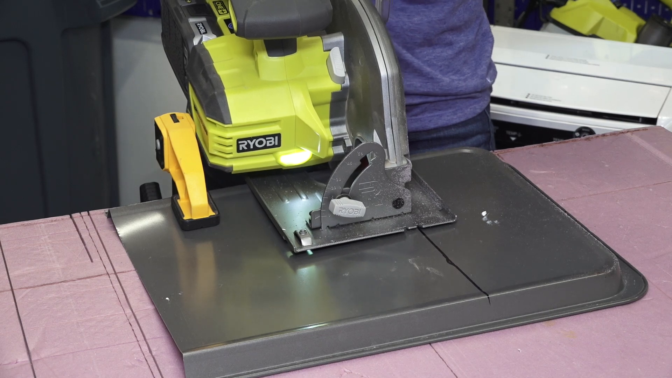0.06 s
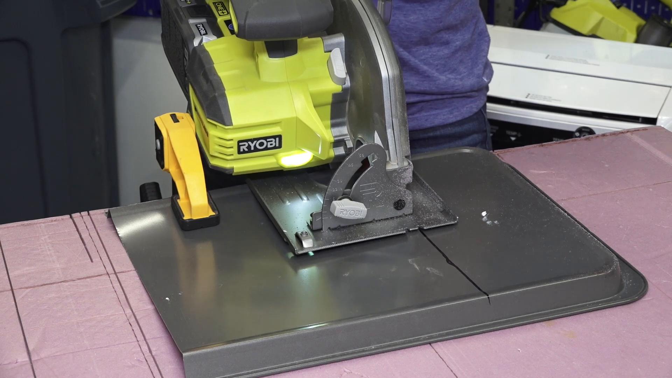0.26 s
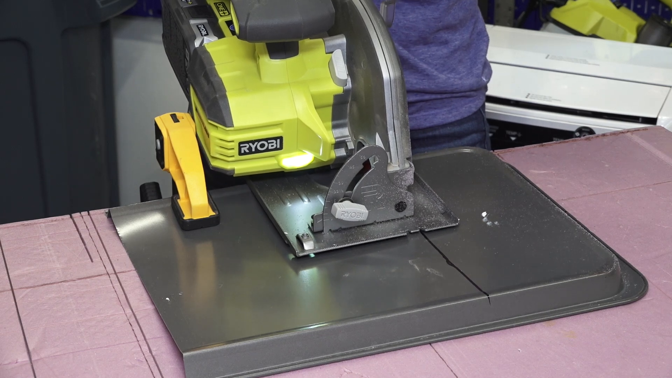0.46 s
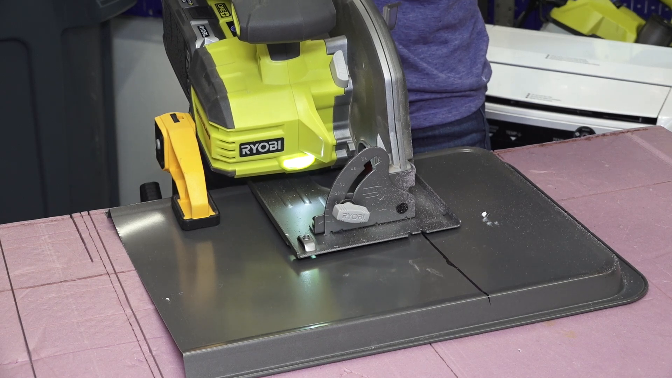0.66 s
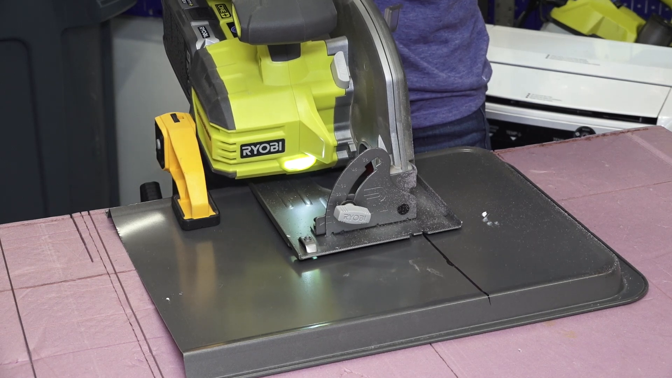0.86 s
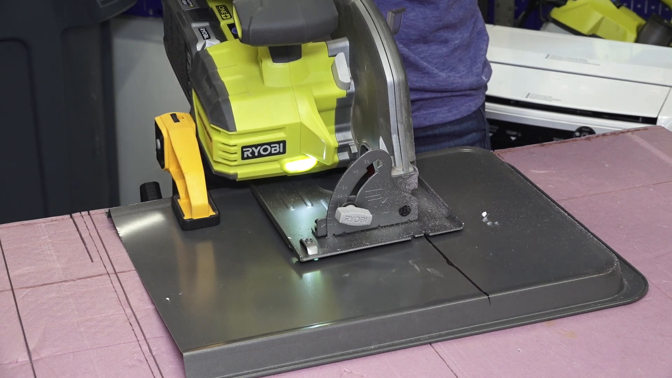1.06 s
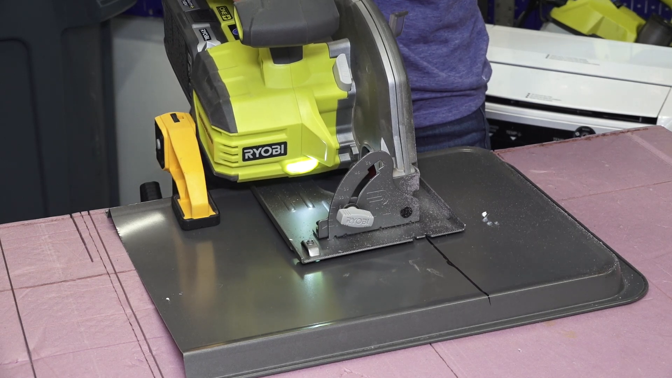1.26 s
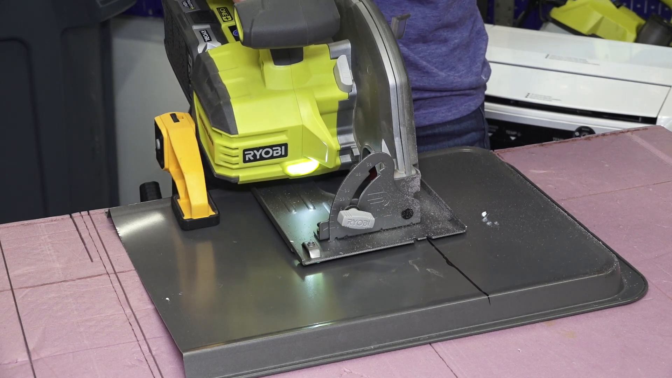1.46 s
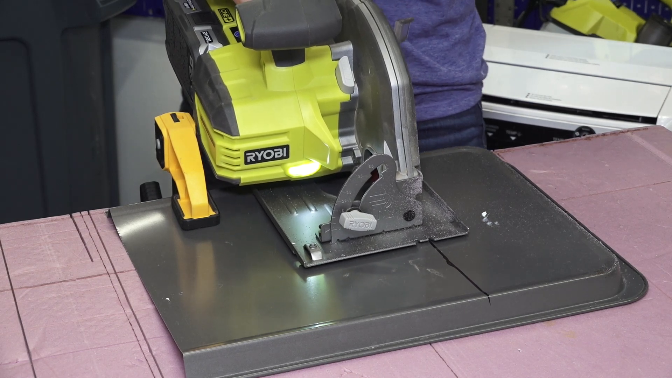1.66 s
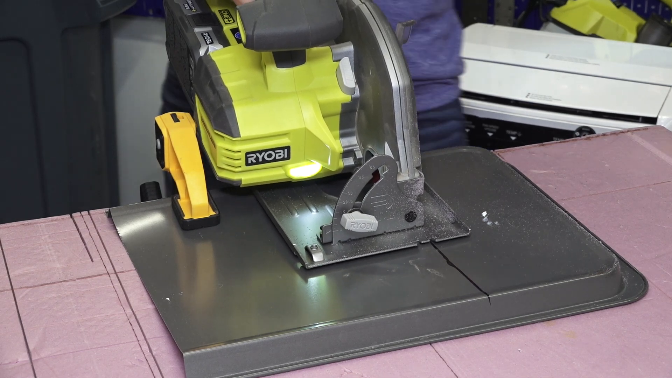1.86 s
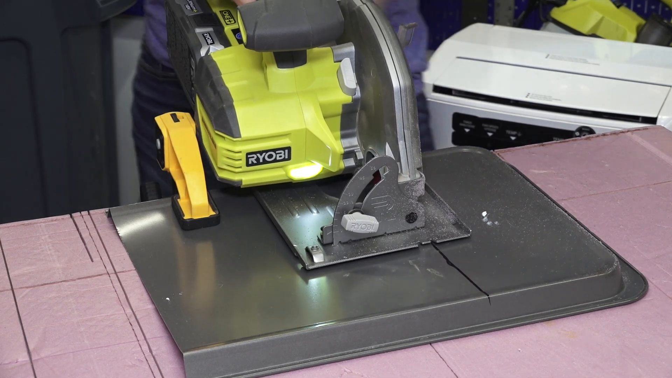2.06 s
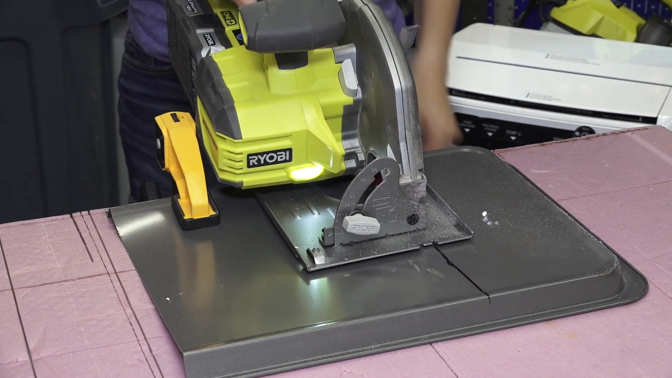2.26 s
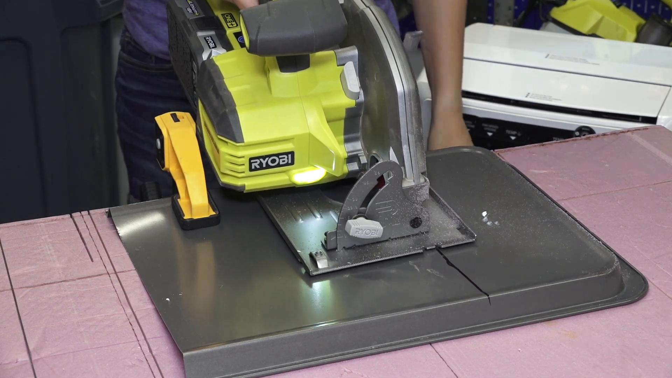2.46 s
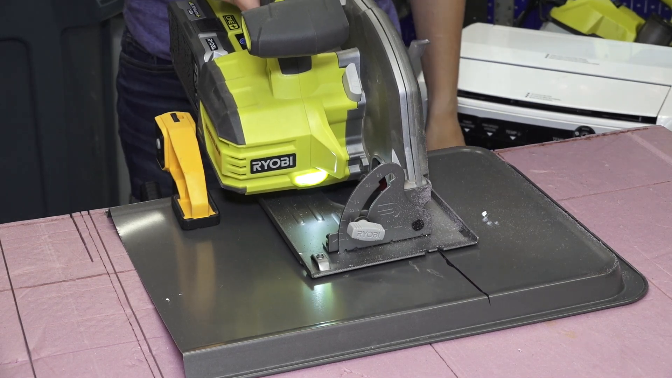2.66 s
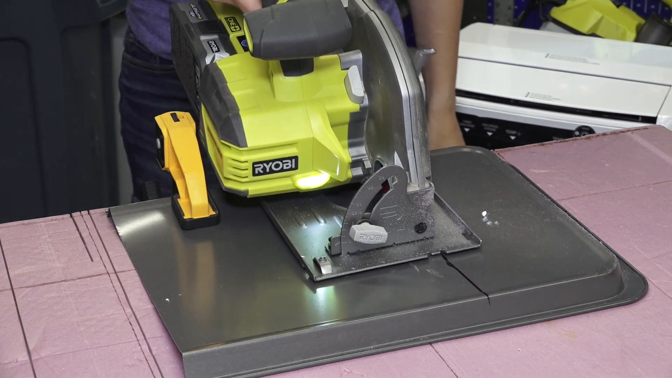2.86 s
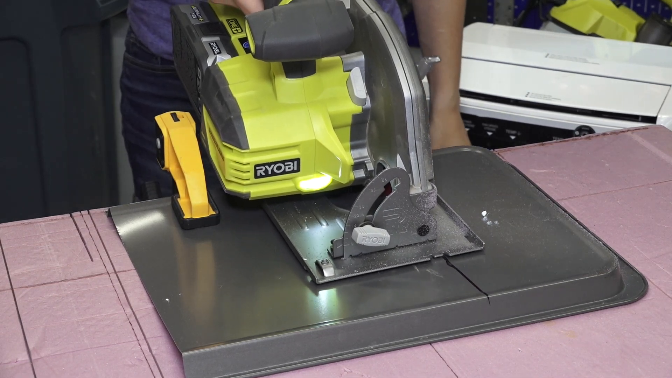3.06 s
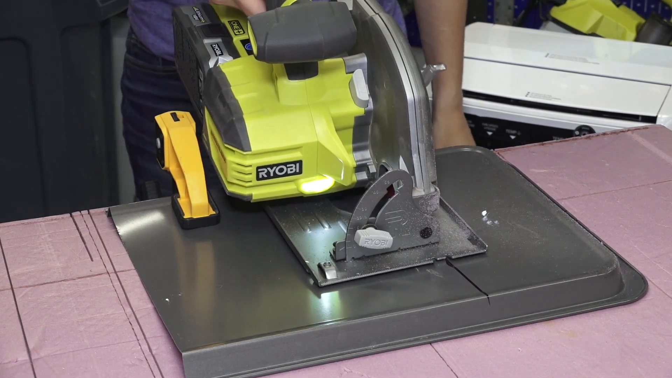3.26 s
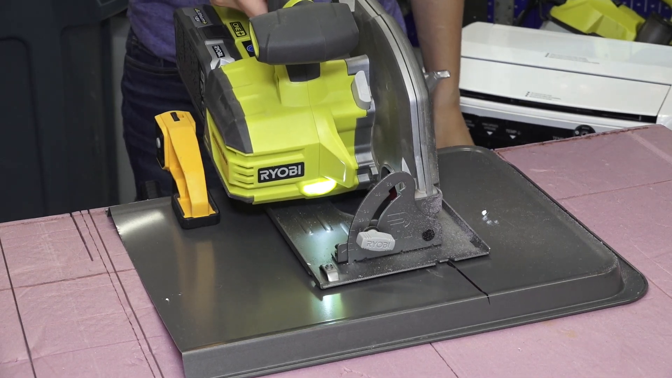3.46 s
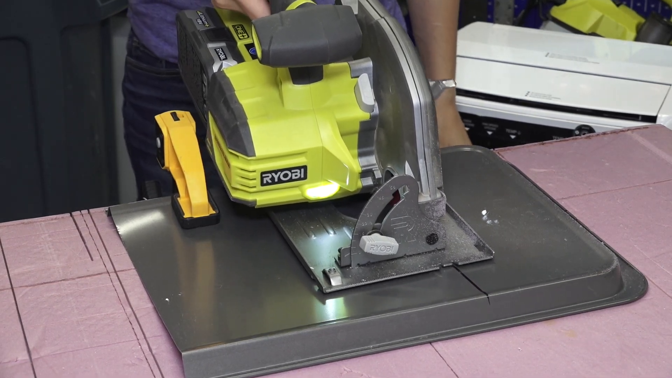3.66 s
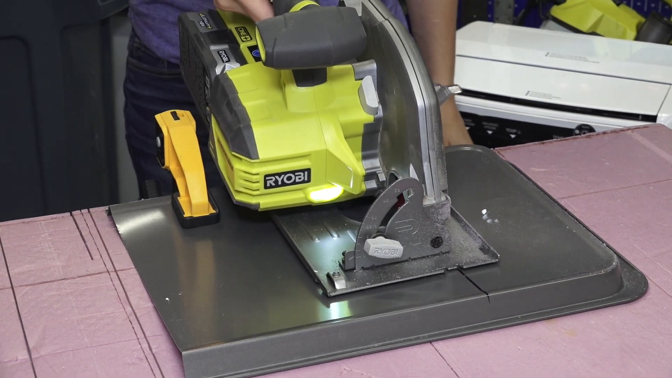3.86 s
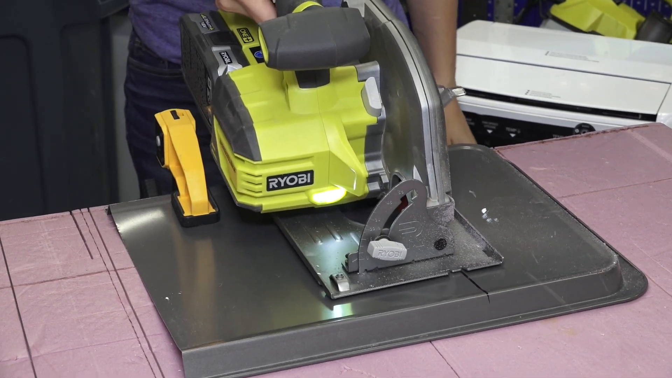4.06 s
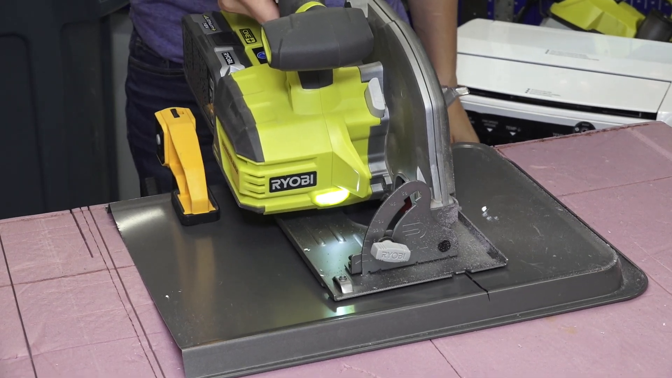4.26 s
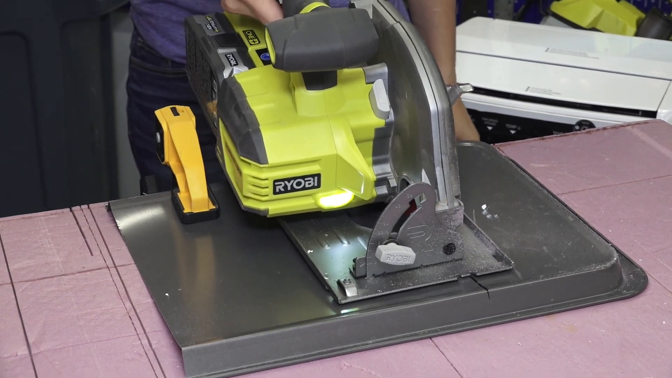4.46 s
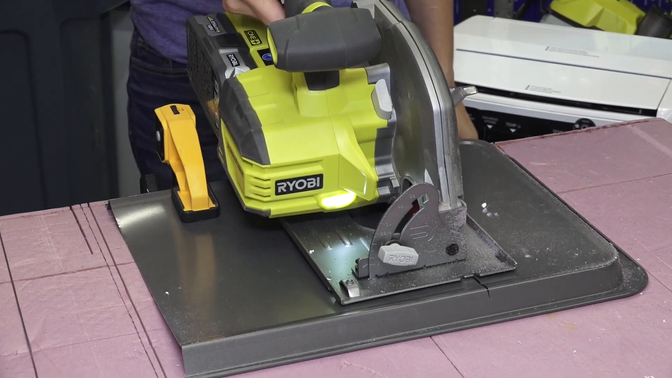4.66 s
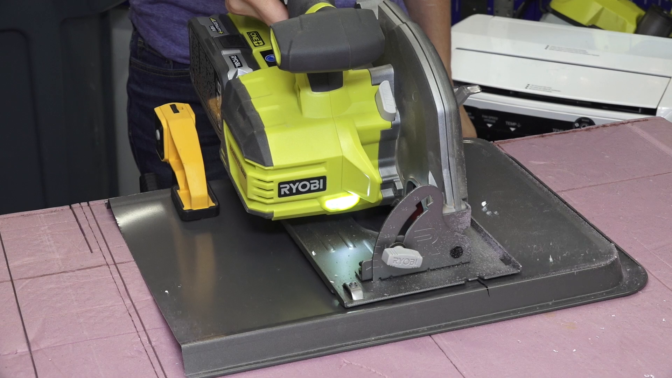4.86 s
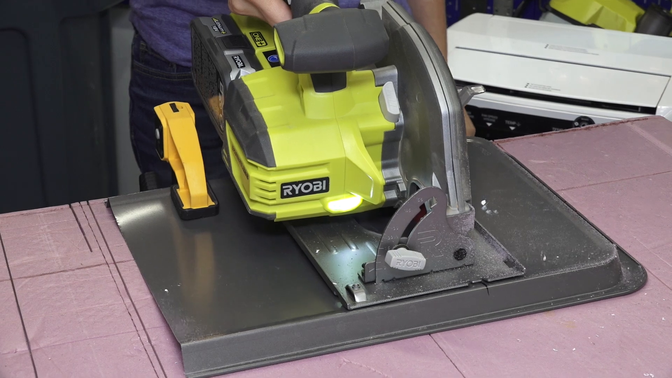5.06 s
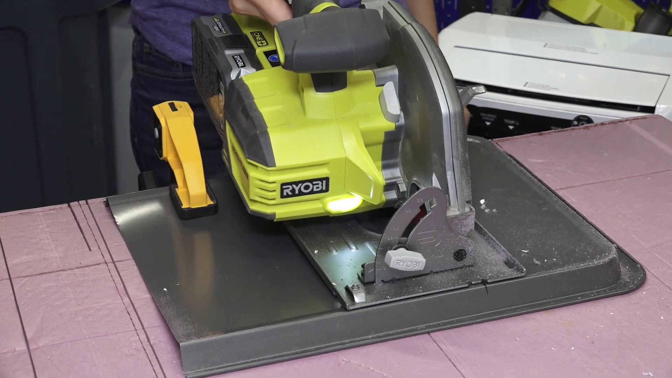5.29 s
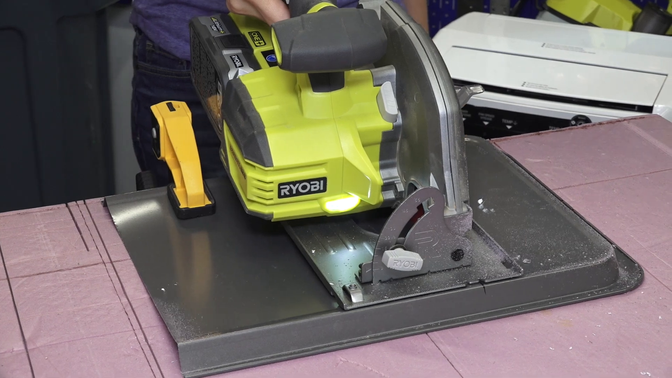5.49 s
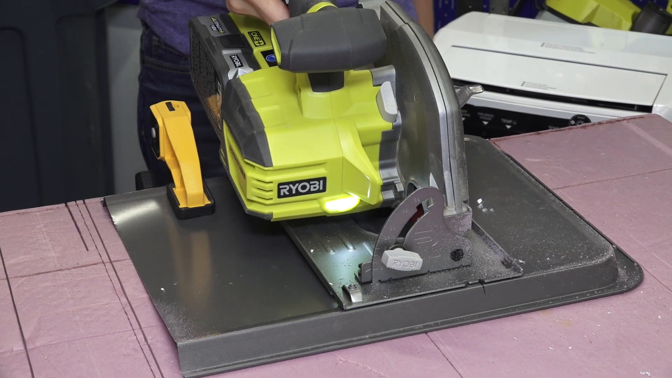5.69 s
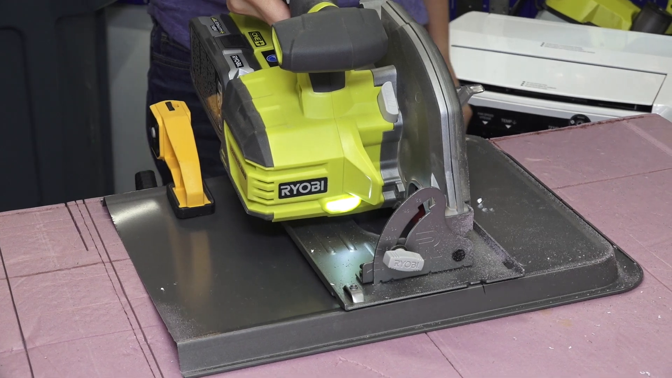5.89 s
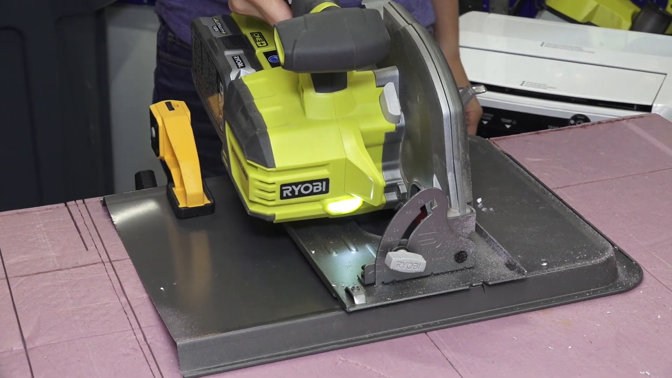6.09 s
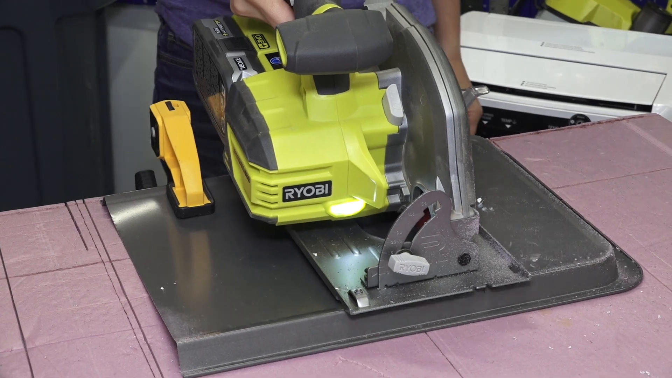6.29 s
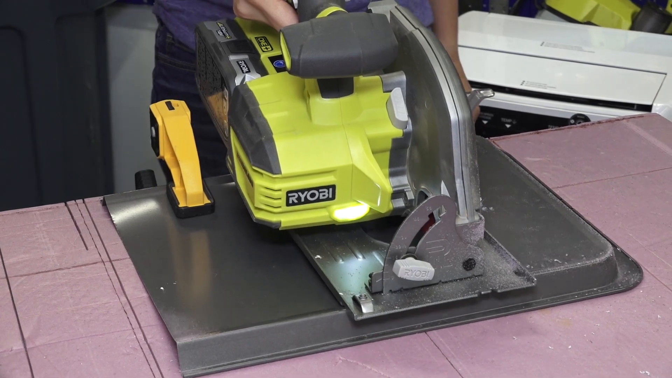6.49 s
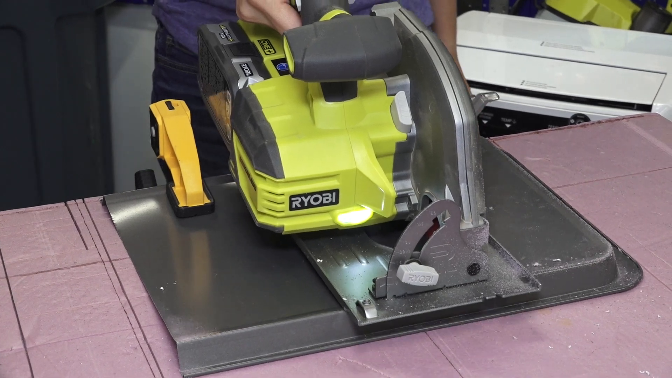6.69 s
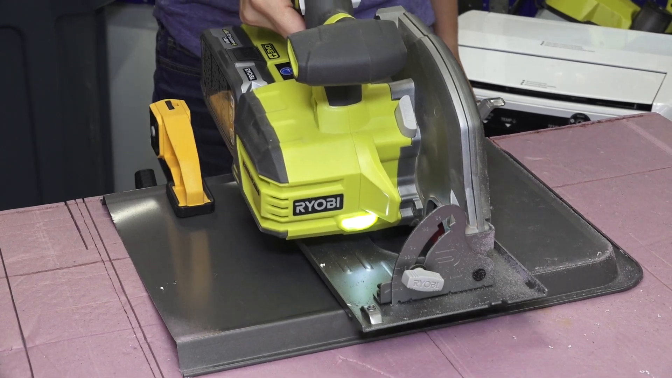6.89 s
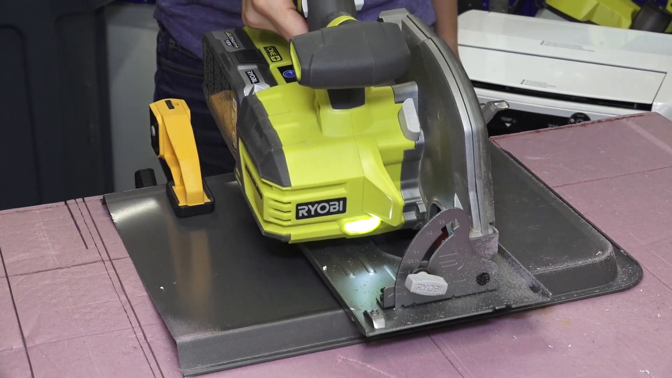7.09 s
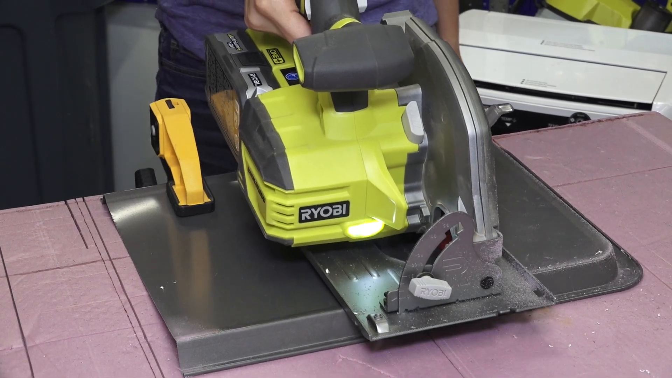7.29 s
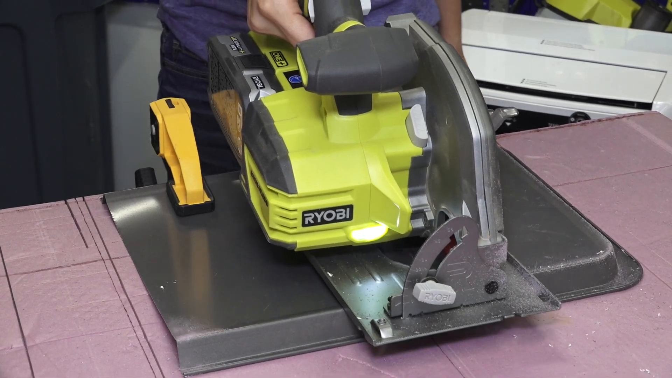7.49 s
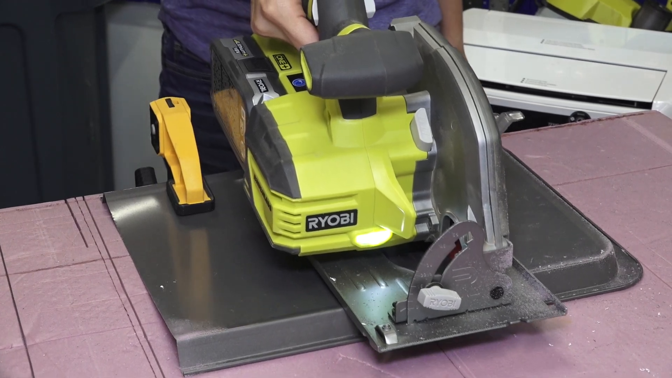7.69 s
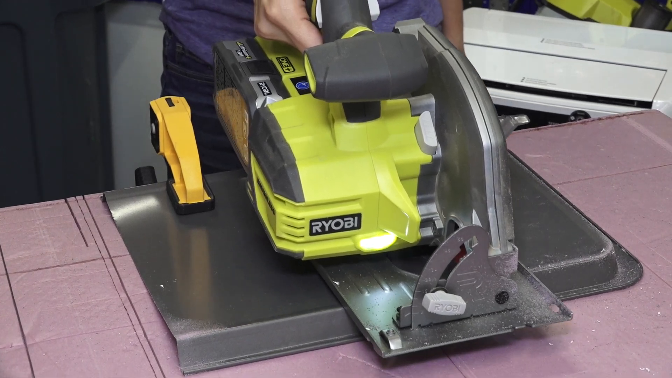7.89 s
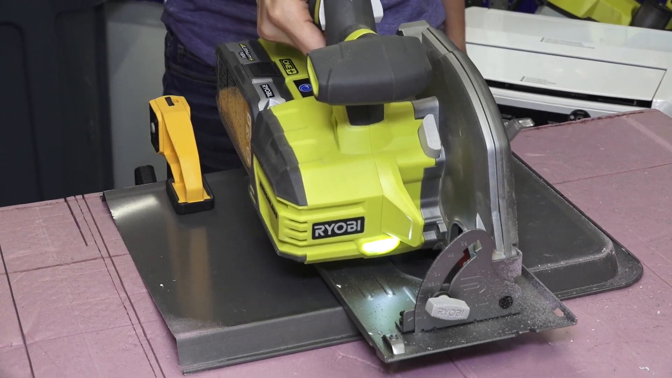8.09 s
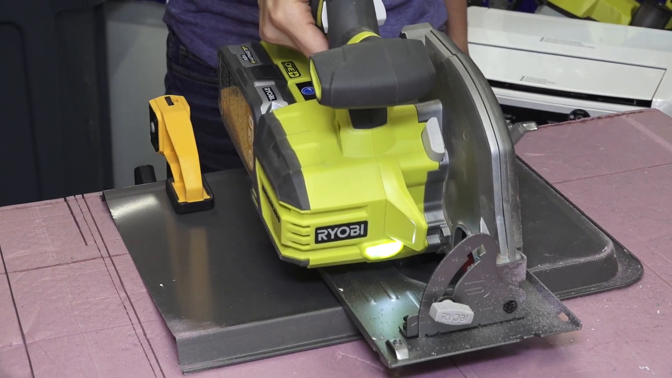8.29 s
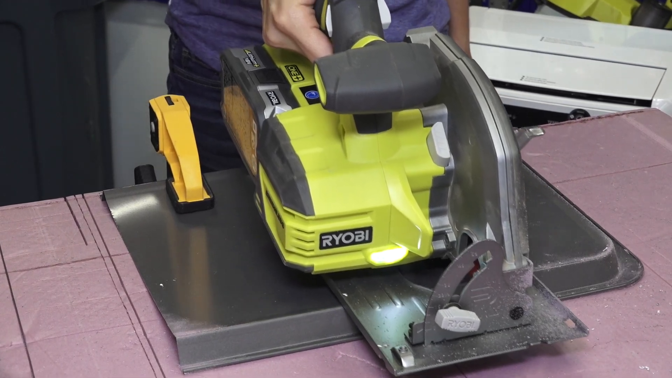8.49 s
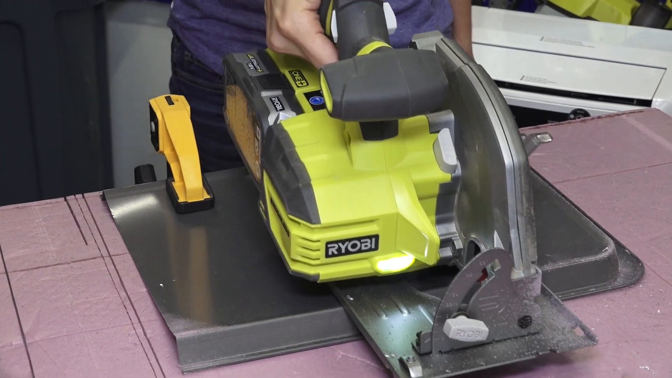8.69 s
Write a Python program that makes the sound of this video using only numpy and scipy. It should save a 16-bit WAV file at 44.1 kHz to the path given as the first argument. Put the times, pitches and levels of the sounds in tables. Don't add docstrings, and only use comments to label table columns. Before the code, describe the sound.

Continuous close metal cutting: a motor-driven toothed blade screams and rasps through sheet steel, fluttering rapidly, with pan ringing and low bench rumble.

```python
import sys
import numpy as np
from scipy import signal
from scipy.fft import rfft, irfft, next_fast_len
from scipy.io import wavfile
from scipy.ndimage import uniform_filter1d, map_coordinates

SR = 44100
rng = np.random.default_rng(int(sys.argv[2]) if len(sys.argv) > 2 else 0)


def decibels_to_gain(level_db):
    exponent = np.asarray(level_db, float) / 20
    return 10 ** exponent


def int16_out(signal):
    q = np.round(np.clip(np.atleast_2d(signal).T, -1, 1) * 32767)
    wavfile.write(sys.argv[1], SR, q.astype(np.int16))


N = 385434

# start_s, grinding level_db
FEED = [(0, -43), (.8, -45.5), (2.3, -46.5), (2.85, -44), (3.05, -37.5), (3.28, -37), (3.43, -41),
        (4.05, -38), (4.55, -41), (4.75, -42), (5.28, -43), (5.46, -40), (5.72, -44), (6.4, -37.5),
        (7.45, -38), (7.9, -40.5), (8.5, -40), (8.74, -48)]
# pitch_hz, level_db
CHIP_COLOUR = [(1200, -23.5), (1900, -5.5), (2600, -4), (3800, -6), (5200, 1), (6400, -3.5), (7800, 4),
               (9100, -5), (10350, 3), (11700, -5), (13000, 0), (14500, -7.5), (17000, 1.5)]


def unit(x):
    return x / np.sqrt(np.mean(np.abs(x) ** 2))


def curves(table):
    s, *columns = np.transpose(table)
    return [np.interp(np.arange(N) / SR, s, c) for c in columns]


def swells(rows, order=2):
    t = np.arange(0, N + 100, 100) / SR
    total = 0 * t
    for s, height, width in rows:
        total = total + height * np.exp(-((t - s) / width) ** order)
    return np.interp(np.arange(N) / SR, t, total)


def colour(x, points):
    hz, db = np.transpose(points)
    size = next_fast_len(len(x))
    f = np.log(np.arange(size // 2 + 1) * SR / size + 1)
    gain = decibels_to_gain(np.interp(f, np.log(hz), db, left=-80, right=-80))
    return unit(irfft(rfft(x, size) * gain, size)[:len(x)])


def walk(rate_hz):
    hold = int(SR / rate_hz)
    steps = np.repeat(rng.standard_normal(N // hold + 1), hold)
    return unit(uniform_filter1d(uniform_filter1d(steps, hold), hold)[:N])


def rim(turns, likeness, count, smooth_orders, points=None):
    rows = rng.standard_normal((int(turns[-1]) + 2, count))
    smooth = np.sqrt(1 + (np.arange(count // 2 + 1) / smooth_orders) ** 2)
    rows = irfft(rfft(rows) / smooth, count)
    keep = np.clip(np.interp(np.arange(len(rows)), turns, likeness), 0, .94)
    for k in range(1, len(rows)):
        rows[k] = keep[k] * rows[k - 1] + np.sqrt(1 - keep[k] ** 2) * rows[k]
    rough = rows.ravel()
    if points:
        rough = colour(rough, points)
    return unit(map_coordinates(rough, [turns * count], order=3))


def speed():
    # start_s, speed in turns per s
    shaft = [(0.0, 58.44), (1.81, 55.8), (2.38, 56.12), (2.66, 55.16), (2.94, 55.74), (3.28, 54.01),
             (3.68, 54.7), (4.16, 53.61), (4.78, 56.62), (5.16, 56.62), (5.56, 58.52), (5.84, 58.56),
             (6.12, 56.85), (6.5, 55.67), (7.0, 55.26), (7.31, 55.93), (7.66, 55.33), (8.74, 56.27)]
    # centre_s, change in turns per s, half_width_s
    surges = [
        (.88, .22, .15),
        (4.8, .1, .06),
        (5.0, -.18, .08),
        (7.9, -.13, .14),
        (8.25, .27, .13),
        (8.52, -.1, .08),
    ]
    return curves(shaft)[0] + swells(surges)


def shake(turns, likeness):
    # multiple of the blade speed, level_db
    blade_lines = [(1, -90), (3, -111), (6, -79), (9, -76.5), (10, -80), (13, -81), (21, -71.5)]
    # multiple of the motor speed, level_db
    motor_lines = [(1, -81), (2, -82), (7, -61), (13, -66), (14, -67.5)]
    motor_turns = 46 / 7 * turns
    feed_db = curves(FEED)[0]
    blade, motor = 0, 0
    for m, db in blade_lines:
        blade = blade + decibels_to_gain(db + 2 * walk(1.8)) * np.sin(2 * np.pi * m * turns)
    for m, db in motor_lines:
        motor = motor + decibels_to_gain(db + 2 * walk(4)) * np.sin(2 * np.pi * m * motor_turns)
    effort = decibels_to_gain(.6 * (feed_db - np.mean(feed_db)))
    return np.sqrt(2) * (blade * 1.73 * likeness ** 2 + motor * effort)


def snags():
    # start_s, crack level_db, thud level_db, ring time to fall 60 dB in s
    catches = [
        (0.1223, -31.5, -54.5, 0.1),
    ]
    # pitch_hz, level_db
    thud_colour = [(60, -8), (150, -4), (500, 0), (1000, -5), (1700, -8)]
    crack = colour(rng.standard_normal(N), CHIP_COLOUR)
    thud = colour(rng.standard_normal(N), thud_colour)
    out, t = 0, np.arange(N) / SR
    for s, db, thud_db, t60 in catches:
        age = np.maximum(t - s, 0)
        fall = np.minimum(age / 0.001, 1) * np.exp(-np.log(1000) * age / t60)
        out = out + fall * decibels_to_gain(db) * crack + fall ** 1.2 * decibels_to_gain(thud_db + 3.5) * thud
    return out


def rings():
    # start_s, end_s, start pitch_hz, end pitch_hz, level_db
    songs = [(0, 0.342, 1112, 1100, -66), (0.132, .5, 1416, 1378, -65), (1.805, 2.258, 1345, 1330, -64.5),
             (2.7, 2.9, 770, 788, -70), (2.9, 3.2, 1120, 1090, -63.5), (3.1, 3.39, 1525, 1537, -55),
             (3.2, 3.55, 1800, 1790, -59.5), (3.6, 3.897, 4270, 4190, -58), (4.344, 4.646, 668, 652, -65),
             (5.848, 6.6, 1626, 1616, -65), (7.407, 7.655, 1990, 1980, -63), (7.8, 8.467, 1510, 1440, -64),
             (7.947, 8.402, 744, 787, -66), (8.05, 8.347, 1135, 1093, -64), (7.95, 8.445, 2220, 2140, -60),
             (8.13, 8.615, 56.5, 56.8, -73), (8.67, 8.8, 12000, 12100, -55), (2.15, 2.5, 5670, 5655, -58),
             (2.52, 2.7, 5880, 5870, -58), (2.6, 2.8, 5030, 5035, -56), (2.9, 3.3, 9800, 9780, -56),
             (3.5, 3.75, 9850, 9850, -56), (4.0, 4.3, 9800, 9760, -55)]
    out, t, waver = np.zeros(N), np.arange(N) / SR, walk(30)
    for start, end, hz, end_hz, db in songs:
        on = (t > start) & (t < end)
        part = (t[on] - start) / (end - start)
        phase = 2 * np.pi * np.cumsum(hz + (end_hz - hz) * part) / SR
        level = decibels_to_gain(db + 5 + 1.54 * waver[on]) * np.sin(np.pi * part) ** 0.3
        out[on] += level * np.sin(phase + 0.86 * waver[on])
        waver = np.roll(waver, SR)
    return out


def pan(x, wet_db):
    ring_t60_s = .15
    t = np.arange(SR // 4) / SR
    place = np.linspace(0, 4, N)
    fall = np.exp(-np.log(1000) * t / ring_t60_s)
    wet = 0
    for k, ring in enumerate(rng.standard_normal((5, len(t))) * fall):
        share = np.cos(np.pi / 2 * np.clip(place - k, -1, 1))
        wet = wet + signal.oaconvolve(share * x, ring / np.sqrt(np.sum(ring ** 2)))[:N]
    return (x + decibels_to_gain(wet_db) * wet) / np.sqrt(1 + decibels_to_gain(2 * wet_db))


def bite(turns, gain):
    # start_s, depth 0-1, angle of its high side in turns
    runout_table = [(0, .22, .13), (1.05, .34, .07), (2.2, .2, .13), (2.8, .3, .08), (3.05, .05, .15),
                    (4.2, .03, .4), (4.6, .17, .52), (6.2, .13, .35), (6.55, .03, .2), (7.1, .07, .13),
                    (8, .12, .35), (8.74, .09, .3)]
    # centre_s, depth 0-1, half_width_s, angle in turns
    chatter = [(0, 0.3, 0.24, -0.53), (1.25, 0, .12, .97), (5.75, 0.3, 0.25, -1),
               (6.148, 0.35, 0.23, -0.69), (8.74, .17, 0.2, -.6)]
    runout, spot = curves(runout_table)
    a = 2 * np.pi * (turns - spot)
    dig = np.cos(a) + .45 * np.cos(2 * a + 1.2) + .25 * np.cos(3 * a + 2.4)
    buck = 0
    for row in chatter:
        buck = buck + swells([row[:3]]) * np.cos(np.pi * (turns - row[3]))
    press = np.exp(gain * runout * dig + gain * buck)
    return press / np.sqrt(uniform_filter1d(press ** 2, SR // 14))


def grind(turns, likeness, press):
    # centre_s, grinding level_db, half_width_s
    shoves = [(1.06, -0.5, 0.032), (2.47, 2, 0.045), (3.65, 2, .08), (4.62, 3.5, 0.036),
              (4.68, -1.5, 0.027), (4.92, 3.5, 0.064), (5.1, 3.5, 0.037), (6.9, 2, 0.05)]
    # centre_s, level_db, half_width_s
    jolts = [(.5, -6, 0.38), (1.05, 6, .08), (2.0, -6, 0.22), (2.86, 11, 0.086), (3.76, 7, 0.11),
             (4.45, 4, 0.076), (4.93, 7.5, 0.04), (5.6, -8, 0.27), (6.65, 3, 0.31), (8.0, -6, 0.066),
             (8.4, 7, 0.2)]
    # pitch_hz, level_db
    open_body = [(250, -34), (340, -1.5), (600, -0.5), (1000, 1.5), (1500, 4.5), (2000, -3.5), (2600, 1)]
    covered_body = [(250, -35), (340, -5.5), (600, -1.5), (1000, 1), (1500, 3.5), (2000, -6), (2600, 2)]
    bench_colour = [(20, -15), (50, 0), (110, 1), (200, 2), (290, 2.5), (380, -18)]

    db = curves(FEED)[0] + swells(shoves)
    covered = (1 + np.tanh((np.arange(N) / SR - 4.75) / 0.17)) / 2
    body_db = -14 - 2.5 * covered
    bench_db = -32 - 4 * covered + 0.57 * (db - np.mean(db)) + swells(jolts)

    chips = rim(turns, likeness, count=800, smooth_orders=2700.0, points=CHIP_COLOUR)
    chips = chips * decibels_to_gain(1.03 * walk(25))
    drone = rim(turns, likeness ** 0.88, count=128, smooth_orders=210.0)
    body = (1 - covered) * colour(drone, open_body) + covered * colour(drone, covered_body)
    rumble = rim(turns, 0.85 * likeness, count=32, smooth_orders=33.0)
    bench = colour(rumble, bench_colour) * decibels_to_gain(1.3 * walk(11) + 2 * walk(45))

    sheet = pan(decibels_to_gain(db) * (press * chips + decibels_to_gain(body_db) * press ** 0.27 * body), wet_db=-3)
    return sheet + decibels_to_gain(db + bench_db) * bench


def whine(turns, likeness, press):
    free_levels = [-58, -57.5, -54.5, -57.5, -55, -59]
    # centre_s, level_db, half_width_s
    sing_tables = [
        [(2.45, 5, 0.053), (4.43, 8, 0.088), (5.85, 6, .2)],
        [(.65, 5.5, 0.11), (1.4, 5.5, 0.4), (2.85, 9.5, 0.28), (3.76, 13.5, 0.15), (4.42, 6.5, .1),
         (5.0, 7.5, 0.25), (6.47, 9, .14), (7.6, 13, .1), (7.89, 9, .17), (8.41, 9, .18), (8.7, 11, 0.13)],
        [(1.13, 7, 0.15), (2.52, 6.5, 0.13), (2.87, 8.5, 0.11), (4.32, 7.5, 0.13), (4.9, 8, 0.078),
         (6.3, 4.5, 0.22), (6.82, 7, 0.092), (7.47, 8, .1)],
        [(1.15, 6, 0.14), (3.0, 9.5, 0.15), (3.48, 6.5, 0.25), (4.46, 8, 0.078), (8.27, 14, .12)],
        [(2.57, 6, 0.17), (4.43, 5, 0.14), (8.55, 12.5, 0.091)],
        [],
    ]
    more_sing_tables = [
        [(3.03, 4, .07), (4.08, 3.1, 0.053), (7.0, 3, .2), (8.35, 5.4, 0.26)],
        [(2.3, 3, .1), (5.5, 8, .06), (6.04, 7, .14), (3.5, 6, 0.064), (6.85, 5, .12), (7.2, 5.3, .12)],
        [(.72, 4.2, 0.33), (1.65, 2.8, .2), (3.5, 3.9, 0.07), (5.97, 6, .17), (8.0, 4, 0.063), (8.4, 4.4, .1)],
        [(.3, 4.5, .3), (1.68, 5, .1), (3.95, 4.8, .12), (6.12, 6, 0.072), (6.8, 4, .15), (7.33, 5, .12),
         (8.55, 5, 0.14)],
        [(3.4, 5, .1), (3.85, 5, .12), (4.88, 5, .1), (6.05, 5, .15), (6.4, 3.7, .15), (6.85, 4, .15),
         (8.27, 5.1, 0.11)],
        [],
    ]
    # centre_s, level_db, half_width_s
    skims = [
        (6, -12, 0.045),
        (5.65, -5, 0.11),
        (4.65, -4, 0.047),
    ]
    # centre_s, share 0-1, half_width_s
    stiff_edge = (8.4, .8, .35)
    tooth_count, free_turns_per_s = 48, 58.6

    load_db = 1.65 * (free_turns_per_s - speed())
    skim_db = swells(skims)
    twist = np.cumsum(.3 * (1 - press)) / SR
    twist = twist - uniform_filter1d(twist, SR // 14)
    spacing = .00045 * rim(turns, .9 + 0 * turns, count=tooth_count, smooth_orders=2.5)
    edge = turns + (spacing + twist) * (1 - swells([stiff_edge]))
    uneven = 0.28 + 1.06 * likeness ** 2

    out = 0
    for k, (db, sings, more_sings) in enumerate(zip(free_levels, sing_tables, more_sing_tables), 1):
        scatter = uneven * (2 if k == 1 else .8)
        re = rim(turns, likeness ** .15, count=tooth_count, smooth_orders=1.8)
        im = rim(turns, likeness ** .15, count=tooth_count, smooth_orders=1.8)
        teeth = press * (1 + scatter * (re + 1j * im))
        teeth = teeth / np.sqrt(uniform_filter1d(np.abs(teeth) ** 2, SR // 14) / 2)
        level_db = db + load_db + swells(sings + more_sings, order=4) + 1.5 * walk(8)
        if k > 1:
            level_db = level_db + skim_db
        out = out + decibels_to_gain(level_db) * np.real(teeth * np.exp(2j * np.pi * k * tooth_count * edge))
    return out


def scene():
    # start_s, likeness of one turn to the last 0-1
    blade_likeness = [(0, 0.5), (.3, 0.64), (1.6, 0.72), (2.4, 0.9), (2.55, 0.47), (2.8, 0.79), (3.1, 0.13),
                      (3.5, 0.6), (4, 0), (4.5, 0.44), (4.8, 0.13), (6, 0.22), (7, 0), (8.25, .3),
                      (8.74, 0.06)]
    # centre_s, level_db, half_width_s
    lift_off = (8.655, -2.5, 0.027)
    turns = np.cumsum(speed()) / SR
    likeness = np.clip(curves(blade_likeness)[0], 0, 1)
    press = bite(turns, gain=0.44)
    teeth = whine(turns, likeness, press ** 4.24)
    cut = decibels_to_gain(swells([lift_off])) * (teeth + grind(turns, likeness, press))
    return np.tile(cut + rings() + shake(turns, likeness) + snags(), (2, 1))


def band_limit(x):
    return signal.sosfilt(signal.butter(12, 16440, fs=SR, output="sos"), x)


def record(dry):
    size = next_fast_len(N)
    kept = np.arange(size // 2 + 1) * SR / size < 15730
    soft = np.tanh(dry / .07) * .07
    mix = irfft(rfft(soft, size) * kept, size)[:, :N]
    return band_limit(mix)


dry = scene()
out = record(dry)
int16_out(out)
```